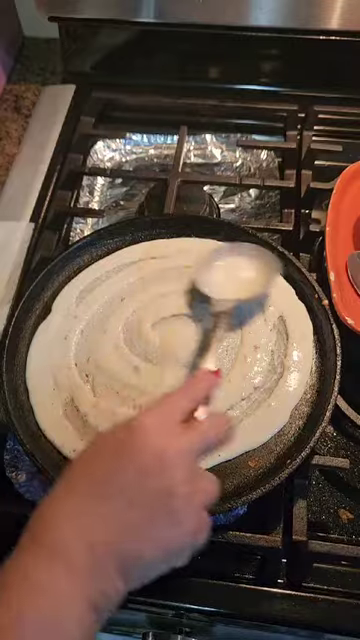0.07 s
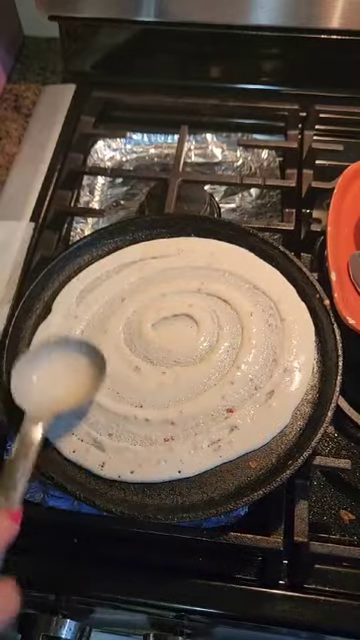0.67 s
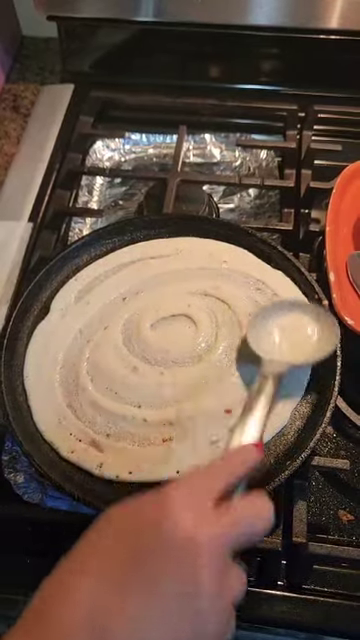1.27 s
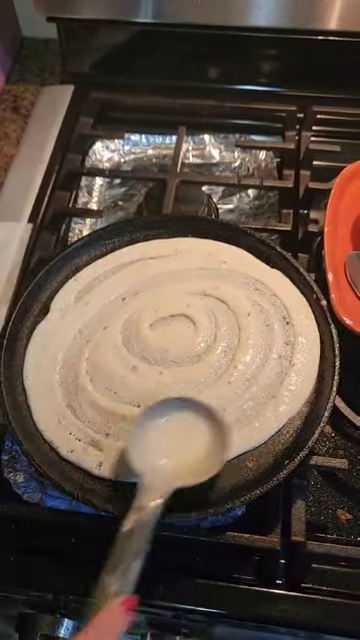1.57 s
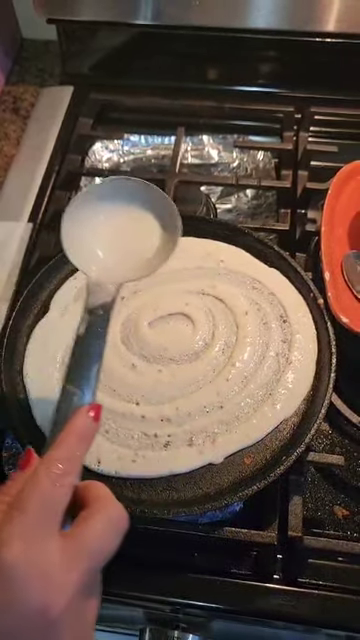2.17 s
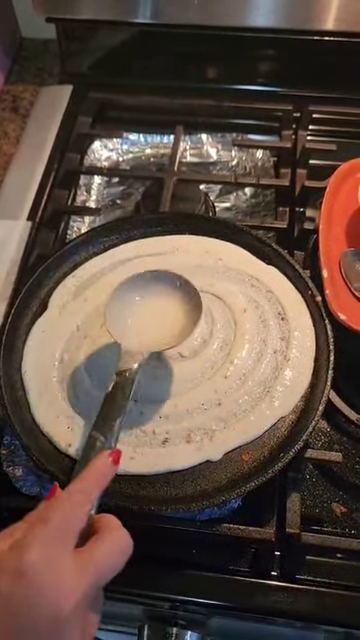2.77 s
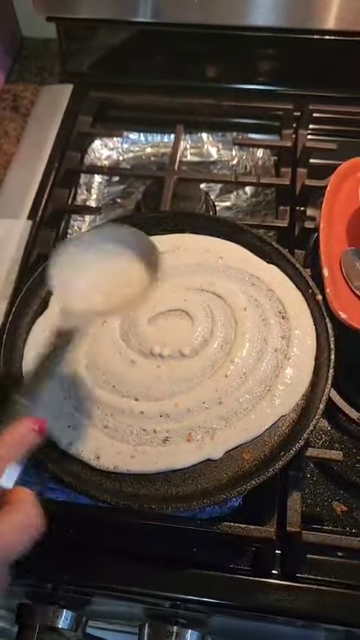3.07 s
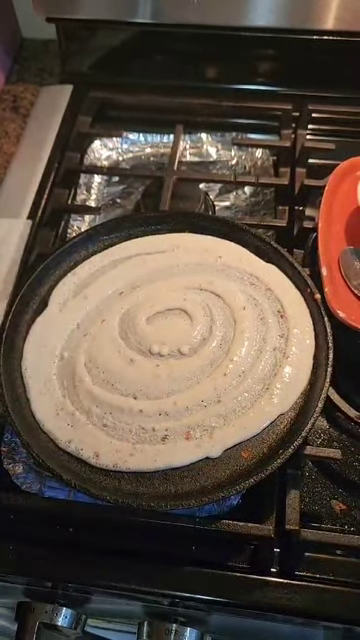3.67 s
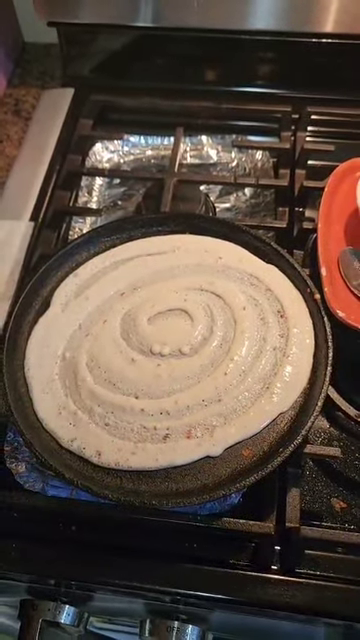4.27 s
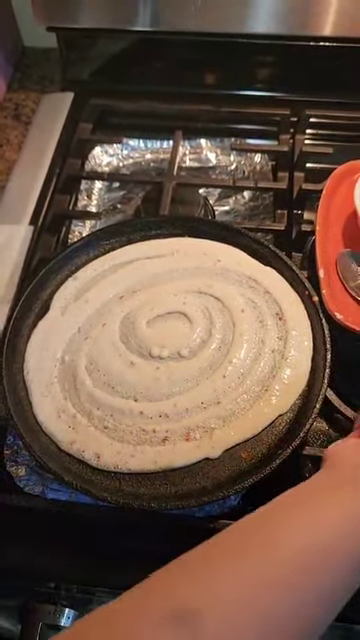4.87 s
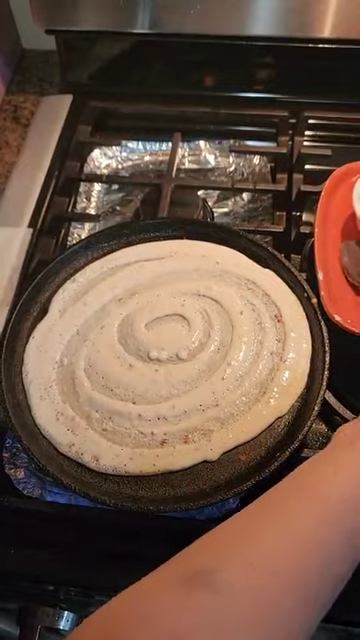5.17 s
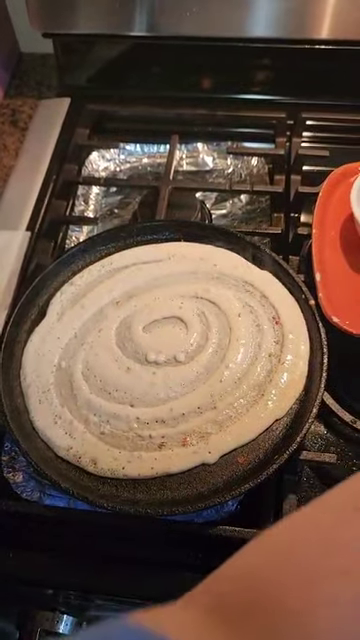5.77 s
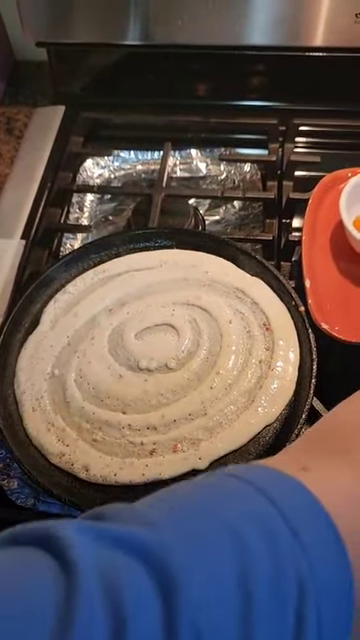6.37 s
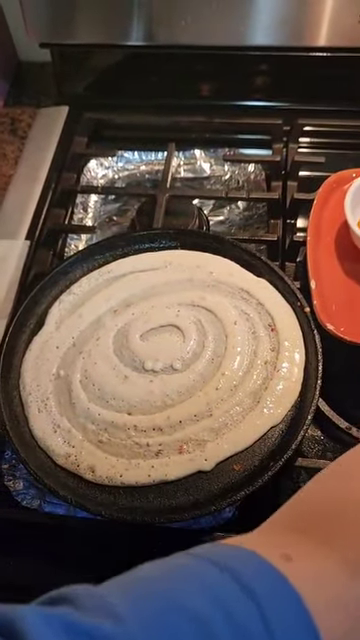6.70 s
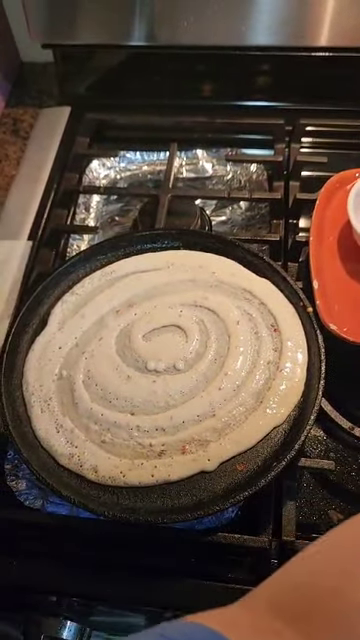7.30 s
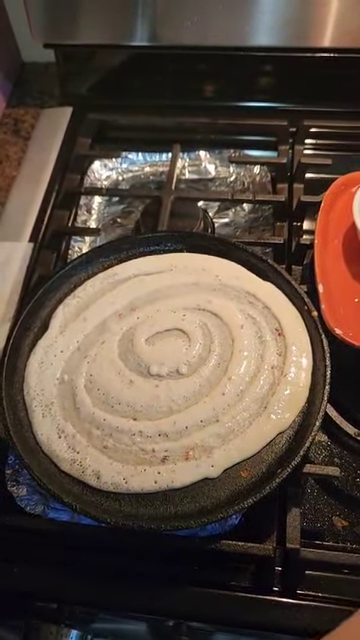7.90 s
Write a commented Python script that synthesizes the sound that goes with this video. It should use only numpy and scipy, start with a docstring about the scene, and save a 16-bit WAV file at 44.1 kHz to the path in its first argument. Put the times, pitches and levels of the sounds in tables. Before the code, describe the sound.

Batter sizzles faintly under a humming kitchen fan; a ladle clatters down, then a steel spoon clinks twice on ceramic and rings loudly.

```python
"""A kitchen, on a stereo pair close to a hot griddle, with the hum and rush of a fan all around.
From the start batter sizzles faintly, bubbling most once it is spread. At 4.1 s a ladle is put down
with a short clatter. From 5.2 s a steel spoon clinks twice on its ceramic rest and rings as it is
lifted away; the loud ring makes the recorder turn its gain down, and the gain then creeps back.
From about 6 s the cook leans across, shading the pan, and knocks a dish lightly."""
import sys
import numpy as np
from scipy import signal
from scipy.fft import rfft, irfft, next_fast_len
from scipy.io import wavfile
from scipy.ndimage import uniform_filter1d, map_coordinates

SR = 44100
rng = np.random.default_rng(int(sys.argv[2]) if len(sys.argv) > 2 else 0)


def to_wav(s):
    """Save 16-bit WAV."""
    ch = np.atleast_2d(s).T  # columns
    pcm = np.round(np.clip(ch, -1, 1) * 32767)  # PCM
    wavfile.write(sys.argv[1], SR, pcm.astype(np.int16))


N = 350154

# spoon contacts: t/s, ring/dB, place (0 edge, 1 bowl), share of the free ring time, crack/dB
SPOON_CONTACTS = [(5.2493, -2.5, 0.22, 0.45, -5), (5.476, 3.5, 0.99, 0.8, -10.5)]
# bubbling peaks once the batter is spread and eases as it sets: t/s, tick level/dB
BUBBLE_LEVEL = [(0, -65), (1.9, -67), (2.45, -63.5), (3.8, -63.5), (5, -68.5), (7.94, -72)]


def spoon_ring(null_depth=0.1, mic_gap_lobes=0.043, rise_s=0.00041):
    """Each contact rings the spoon; as it turns, each mode's lobes sweep past the two microphones."""
    # steel modes: f/Hz, edge hit/dB, bowl hit/dB, t60/s, L-R/dB, left lead/rad,
    # sweep/(lobes per s), start/lobes
    modes = [(1528, -8.5, -21.5, 0.8, 5.5, .6, 8.6, -0.5), (2626, -45, -41, 0.79, 6, .5, 3, -0.31),
             (3015, -44, -40.5, 0.37, 4.5, .5, 3, -.1), (4091, -14, -8, .38, -1, 2.8, 7.5, -.03),
             (4086, -33, -31.5, 1.15, -6, 1, 1.8, -0.25), (6240, -53, -36, 0.35, -7, 1, 3, -.2),
             (7456, -31, -23, .48, 8, 1, 8, 0), (7527, -19, -9.5, .32, 9, 1, 11, -.05),
             (7700, -30.5, -16, 0.17, 7.5, 1.5, 8.7, 0), (10463, -24, -38, .28, -11.5, 0.9, 4, 0),
             (10780, -50, -39.5, 0.25, -13.5, 1, 4, -0.056), (11850, -45, -31.5, 0.42, -9, 1.3, 4, 0),
             (15700, -41.5, -42, 0.21, 8, 1, 3.7, 0)]
    out, t = np.zeros((2, N)), np.arange(SR) / SR
    sides = np.array([[-.5], [.5]])
    attack = 1 - np.exp(-t / rise_s)
    for s, ring_db, place, hold, _ in SPOON_CONTACTS:
        for hz, edge_db, bowl_db, t60, pan, lead, sweep, start in modes:
            # it swings freely only after the blow on the bowl
            angle = np.pi * (place * sweep * t + start + mic_gap_lobes * sides)
            lobes = np.cos(angle) + 1j * null_depth
            wave = lobes * np.exp(1j * (2 * np.pi * hz * t - lead * sides))
            level_db = ring_db + edge_db + place * (bowl_db - edge_db) - 60 * t / (t60 * hold)
            add(out, s, panned(pan) * amp(level_db) * wave.imag * attack)
    return out


def spoon_crack(t60=0.029, rise_s=0.001, rest_db=-14):
    """Steel on ceramic, close by: a hard crack and the short ring of the rest."""
    crack_spectrum = [(400, -24.5), (1000, -16.5), (1900, -5.5), (2400, -14.5), (3100, -1), (3500, -5),
                      (4500, 6), (5500, -8.5), (7000, -6), (7700, -3), (9300, -29), (10600, -8.5),
                      (12500, -27), (15800, -16.5)]  # contact noise: f/Hz, level/dB
    rest_modes = [(1880, 83, 4.5), (3090, 82, -7.5), (3790, 17, -8.5), (4060, 27, -15), (4200, 19, -26),
                  (4650, 61, -15), (4900, 35, -10.5), (5800, 140, -20.5), (6100, 76, -4)]  # the ceramic rest: f/Hz, width/Hz, level/dB
    out = np.zeros((2, N))
    for s, *_, crack_db in SPOON_CONTACTS:
        crack = burst(crack_spectrum, t60) + amp(rest_db) * ring(rest_modes)
        attack = 1 - np.exp(-np.arange(crack.shape[1]) / SR / rise_s)
        add(out, s, amp(crack_db) * crack * attack)
    return out


def ladle(ring_db=-8, scrape_db=-4, t60=0.093):
    """Near the centre, the wet ladle chatters to rest in a few quick, damped contacts."""
    contacts = [(4.109, -23.5), (4.1115, -31), (4.118, -38), (4.1231, -23), (4.130, -29), (4.133, -27),
                (4.143, -37), (4.311, -41)]  # the ladle touches down: t/s, level/dB
    modes = [(1240, 40, -14), (1720, 110, -3.5), (2720, 36, -15), (3530, 43, -7), (4166, 33, -4),
             (4630, 32, -10), (5540, 22, -6), (6460, 57, 0), (7460, 43, 1), (7700, 60, 1), (8400, 22, -6),
             (10600, 45, -12), (11500, 26, -4), (12800, 45, -10), (14300, 45, -4), (15400, 45, -5)]  # its resonances: f/Hz, width/Hz, level/dB
    scrape_spectrum = [(530, -47), (900, -15), (2140, -18), (2300, -17), (2630, -9), (3070, -33),
                       (4150, -5), (5160, -17), (5410, -14), (7490, 0.5), (9770, -15), (11600, -10),
                       (16000, -19)]  # contact noise: f/Hz, level/dB
    out = np.zeros((2, N))
    for s, db in contacts:
        contact = amp(ring_db) * ring(modes) + amp(scrape_db) * burst(scrape_spectrum, t60)
        add(out, s, amp(db) * contact)
    return out * panned(1.2)


def dish(ring_db=-6, tap_db=-4, t60=0.042):
    """Light knocks on a nearby dish; soft ones leave out its high modes."""
    # knocks: t/s, level/dB, treble limit/Hz, hollow note of the spot struck/Hz, its level/dB
    knocks = [(6.2303, -25, 9000, 690, 0), (6.234, -29, 9000, 676, -1), (6.363, -30.5, 900, 770, 0.5),
              (7.061, -25.5, 1200, 782, 1.5)]
    modes = [(1510, 15.5, 1.5), (2440, 37, -7), (5330, 110, 7), (6240, 56, 2.5), (7470, 62, 3.5)]  # the dish's resonances: f/Hz, width/Hz, level/dB
    tap_spectrum = [(400, -10), (1400, 0), (2000, -6), (4500, -7), (8000, -17), (10000, -24), (16000, -18)]  # contact noise: f/Hz, level/dB
    out = np.zeros((2, N))
    for s, db, limit_hz, hollow_hz, hollow_db in knocks:
        ringing = ring([*modes, (hollow_hz, 18, hollow_db)])
        knock = amp(ring_db) * ringing + amp(tap_db) * burst(tap_spectrum, t60)
        add(out, s, amp(db) * filtered(knock, lambda hz: 1 / (1 + 1j * hz / limit_hz) ** 2))
    return out


def pops(snap_db=-2.0, snap_t60=0.0081, scatter_db=-18, scatter_t60=.06):
    """Larger bubbles snap open; the stove top scatters each snap."""
    loudest = [(0.0593, -32.5, -5), (0.491, -33, -8), (1.3314, -31.5, 0.0), (2.229, -32.5, -7),
               (2.273, -26, -6.5), (2.3464, -31, -4), (2.3655, -32, -3), (2.5345, -27, -10.5),
               (2.6227, -32, -7), (2.7541, -30, -5), (2.8566, -32.5, -17), (3.075, -27.5, -6.0),
               (3.3298, -33, -7), (3.498, -37.5, -9), (3.7923, -29.5, -1), (3.987, -32.5, -9)]  # bursting bubbles: t/s, level/dB, L-R/dB
    spectrum = [(1500, -15.5), (4000, -4), (5800, -3), (7500, 9.5), (9500, -6.5), (12000, 8), (16000, -1)]  # one snap: f/Hz, level/dB
    out = np.zeros((2, N))
    for s, db, pan in [*loudest, *small_pops()]:
        snap = amp(snap_db) * burst(spectrum, snap_t60)[0]
        scatter = amp(scatter_db) * burst(spectrum, scatter_t60)
        add(out, s, amp(db) * panned(pan) * (snap + scatter))
    return from_pan(out)


def small_pops(count=54, over_ticks_db=24, spread_db=7.0, pan_db=-2):
    """Middling bubbles, denser and louder when the batter bubbles most: t/s, level/dB, L-R/dB."""
    tick_db, = curves(BUBBLE_LEVEL)
    activity = np.cumsum(amp(tick_db) ** 2)
    at = np.searchsorted(activity, rng.random(count) * activity[-1])
    size, lean = rng.standard_normal((count, 2)).T
    return np.transpose([at / SR, tick_db[at] + over_ticks_db + spread_db * size, pan_db + 2 * lean])


def sizzle(ticks_per_s=260, spread_db=6.5, hiss_db=-62, drying_db_per_s=0.44):
    """Louder on the right, tiny bubbles tick and steam hisses under the batter, thinning as it dries."""
    fizz_spectrum = [(3000, -10.5), (5500, -3), (8000, 7), (9400, -14), (10500, -3.5), (11800, 5),
                     (14000, -2.5), (16000, -2.5)]  # steam and ticks: f/Hz, level/dB
    colour = lambda hz: amp(along(fizz_spectrum, hz))
    t = np.arange(N) / SR
    tick_db, = curves(BUBBLE_LEVEL)
    onsets = rng.random(N) < ticks_per_s / SR
    sizes = amp(spread_db * np.minimum(rng.exponential(size=N), 4))
    ticks = from_pan(onsets * sizes * panned(rng.normal(-5, 3, N)))
    bubbles = amp(tick_db) * unit(filtered(ticks, colour))
    hiss = unit(filtered(rng.standard_normal((2, N)), colour)) * panned(-5.5)
    steam = amp(hiss_db - drying_db_per_s * t) * hiss
    surge_db = .6 * wobble(6)
    shade_db = 2 * np.exp(-((t - 6.55) / .5) ** 2)  # the cook leans between pan and microphones
    return amp(surge_db - shade_db) * (steam + bubbles)


def from_pan(x):
    """Sound from the pan reaches the left microphone slightly earlier."""
    return filtered(x, lambda hz: arrival(hz, lead_ms=.2))


def fan(rush_db=-45.5, rumble_db=-40, flutter_db=0.77, swell_db=-0.17):
    """Motor tones, a low rumble and air rushing through the duct; the low end swells and sinks a bit."""
    rush_spectrum = [(160, -3.5), (280, -5), (333, -9.5), (380, -7.5), (446, -10), (650, -8.5), (832, -6),
                     (1620, -11.5), (1770, -15.5), (2110, -16), (2540, -14.5), (4480, -20), (5660, -25.5),
                     (8010, -27), (9000, -42), (11700, -68.5), (19800, -120)]  # moving air: f/Hz, level/dB
    duct_modes = [(373, 65, 5), (561, 102, 9), (643, 130, 4.5), (1190, 75, 4.5), (2088, 76, 8),
                  (2740, 88, 6), (4520, 540, 3.5)]  # duct resonances: f/Hz, width/Hz, lift/dB
    rumble_spectrum = [(22, -33), (36, -30), (48, -17.5), (62, -6), (73, 4.5), (100, 2), (116, 4),
                       (136, -2.5), (155, -3.5), (195, -8.5), (240, -7), (330, -27), (450, -61.5)]  # the fan's low end: f/Hz, level/dB
    tones = [(57.7, -48.5, 4.5, -1, .1), (119.6, -37, 2.5, 1, .1), (649.3, -57, 10.5, 2, 1.8),
             (1571, -70, 25, 1.5, .8)]  # motor and mains: f/Hz, level/dB, L-R/dB, waver/dB, phase jitter/rad
    t = np.arange(N) / SR
    duct_db = lambda hz: sum(db / (1 + (2 * (hz - centre) / width) ** 2)
                             for centre, width, db in duct_modes)
    air_gain = amp(rush_db + flutter_db * wobble(18))
    air = air_gain * airflow(lambda hz: along(rush_spectrum, hz) + duct_db(hz))
    rumble = amp(rumble_db) * airflow(lambda hz: along(rumble_spectrum, hz))
    hum = np.zeros((2, N))
    for hz, db, pan, waver, jitter in tones:
        gain = np.sqrt(2) * panned(pan) * amp(db + waver * wobble(5.7))
        hum += gain * np.sin(2 * np.pi * hz * t + jitter * wobble(20))
    return air + amp(swell_db * wobble(4)) * (rumble + hum)


def airflow(colour_db):
    """Steady noise at the microphones: part comes straight from the fan, part by way of the room."""
    likeness = [(60, 0.94), (130, 1), (260, 0.87), (330, .5), (400, 0.18), (700, 0)]  # standing room waves: f/Hz, left-right likeness
    direct_share = [(280, 0), (420, 0.13), (520, 0.68), (650, 0.36), (1000, 0.14), (2100, .5),
                    (4000, 0.025), (8000, 0.19)]  # the straight path: f/Hz, share of the fan's power
    balance = [(60, 3.5), (99, 1), (160, 5), (270, -0.5), (450, 5.5), (740, 5.5), (1220, 0), (2010, 2),
               (3330, 0), (5500, 0), (9080, 15), (15000, -12)]  # the fan's lean across the pair: f/Hz, L-R/dB

    def paths(hz):
        turn = np.arccos(np.clip(along(likeness, hz), 0, 1)) / 2
        share = np.clip(along(direct_share, hz), 0, 1)
        room = np.sqrt(1 - share)
        return amp(colour_db(hz)) * [room * np.cos(turn), room * np.sin(turn), np.sqrt(share)]
    mid, side, direct = filtered(rng.standard_normal((3, N)), paths)
    direct = filtered(direct, lambda hz: arrival(hz, lead_ms=.48))
    pair = np.array([mid + side, mid - side]) + direct
    pair = filtered(pair, lambda hz: panned(along(balance, hz)))
    return pair / pair.mean(0).std()


def kitchen(x, gap_s=.003):
    """The room's diffuse answer, each frequency dying at its own speed."""
    decay = [(200, 0.16), (2000, 0.31), (7500, 0.41), (15000, .2)]  # reverberation time: f/Hz, t60/s
    hz, t, noise = signal.stft(rng.standard_normal((2, SR // 2)), SR, nperseg=256)
    tail = signal.istft(noise * amp(-60 * t / along(decay, hz)[:, None]), SR, nperseg=256)[1]
    tail = np.pad(tail / np.linalg.norm(tail[0]), ((0, 0), (int(gap_s * SR), 0)))
    return signal.fftconvolve(x, tail, axes=1)[:, :N]


def gain_control(x, threshold_db=-17, deepest_cut_db=4, recover_db_per_s=0.73):
    """A sustained loud sound turns the recorder's gain down at once; it returns at a steady rate."""
    power = np.abs(uniform_filter1d(np.mean(x ** 2, 0), int(.03 * SR)))
    cut_db = np.clip(10 * np.log10(power + 1e-12) - threshold_db, 0, deepest_cut_db)
    return_db = recover_db_per_s * np.arange(N) / SR
    return x * amp(return_db - np.maximum.accumulate(cut_db + return_db))


def burst(spectrum, t60):
    """Coloured stereo noise that starts at once and dies away."""
    t = np.arange(SR // 4) / SR
    noise = filtered(rng.standard_normal((2, len(t))), lambda hz: amp(along(spectrum, hz)))
    return unit(noise) * amp(-60 * t / t60)


def ring(modes):
    """Damped modes (f/Hz, width/Hz, level/dB), reaching each microphone at its own phase."""
    t = np.arange(SR // 4) / SR
    return sum(amp(db) * np.exp(-np.pi * width * t) * np.sin(2 * np.pi * (hz * t + rng.random((2, 1))))
               for hz, width, db in modes)


def arrival(hz, lead_ms):
    """Left and right responses for a sound that reaches the left microphone first."""
    return np.exp(1j * np.pi * hz * lead_ms / 1000 * np.array([[1], [-1]]))


def panned(db):
    """Left and right gains for a level difference."""
    return amp(np.array([[.5], [-.5]]) * db)


def amp(db):
    """Decibels to gain."""
    return 10 ** (np.asarray(db) / 20)


def unit(x):
    """Scale to rms 1."""
    return x / np.sqrt(np.mean(x ** 2) + 1e-20)


def along(points, hz):
    """Interpolate (f/Hz, value) points on a log axis."""
    f, v = np.transpose(points)
    return np.interp(np.log(hz + 1), np.log(f + 1), v)


def curves(rows):
    """One value per sample for each column after the time."""
    s, *cols = np.transpose(rows)
    return [np.interp(np.arange(N) / SR, s, c) for c in cols]


def wobble(rate):
    """A smooth random curve, rate knots a second."""
    return map_coordinates(rng.standard_normal(int(N * rate / SR) + 4), [np.arange(N) * rate / SR])


def filtered(x, response):
    """Pass x through a frequency response."""
    n = x.shape[-1]
    m = next_fast_len(n + 8192)
    return irfft(rfft(x, m) * response(np.fft.rfftfreq(m, 1 / SR)), m)[..., :n]


def add(track, s, x):
    """Mix x into the track from time s."""
    part = track[:, round(s * SR):][:, :x.shape[-1]]
    part += x[..., :part.shape[-1]]


def scene(ring_room_db=-16, hits_room_db=-9):
    """Utensils and pan close by, the fan all around; the lifted spoon rings almost dry."""
    ringing = spoon_ring()
    hits = spoon_crack() + ladle() + dish() + pops()
    room = kitchen(amp(ring_room_db) * ringing + amp(hits_room_db) * hits)
    return ringing + hits + room + fan() + sizzle()


def record(dry, top_hz=15950):
    """The recorder rides its gain, rounds off the highest peaks and cuts steeply at its band limit."""
    x = gain_control(dry)
    rounded = x / (1 + np.abs(x) ** 6) ** (1 / 6)
    return filtered(rounded, lambda hz: 1 / np.sqrt(1 + (hz / top_hz) ** 160))


dry = scene()
out = record(dry)
to_wav(out)
```